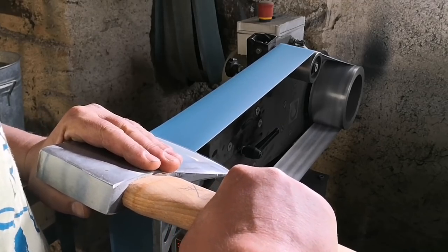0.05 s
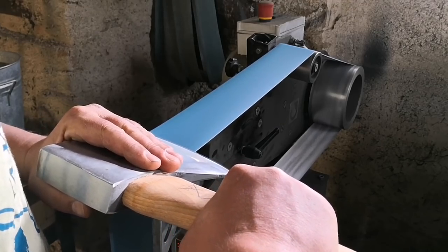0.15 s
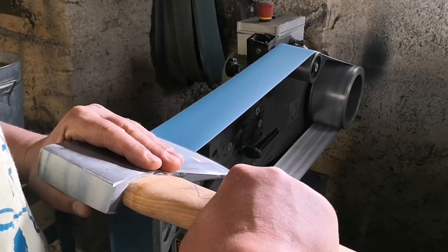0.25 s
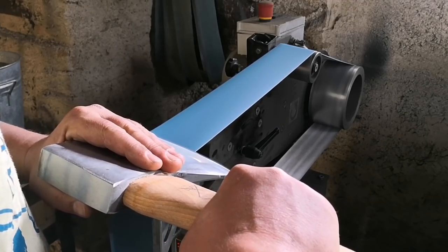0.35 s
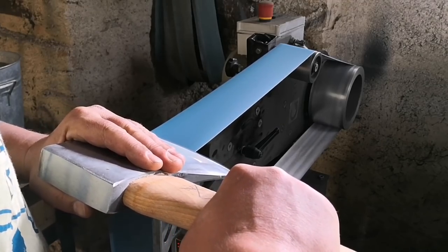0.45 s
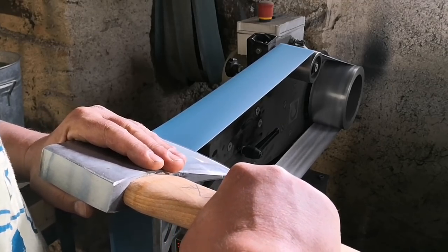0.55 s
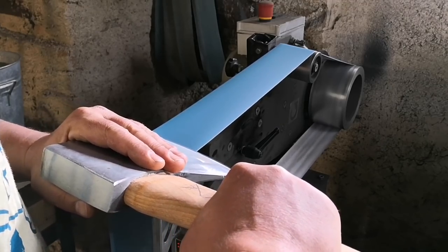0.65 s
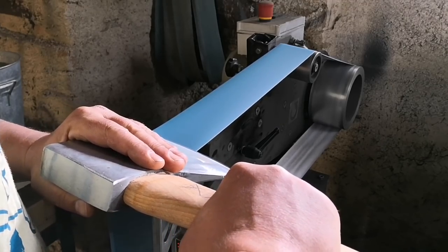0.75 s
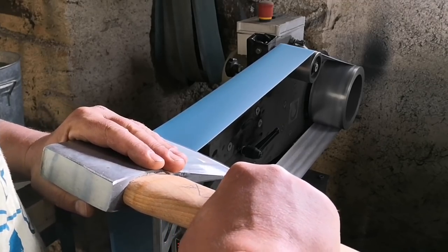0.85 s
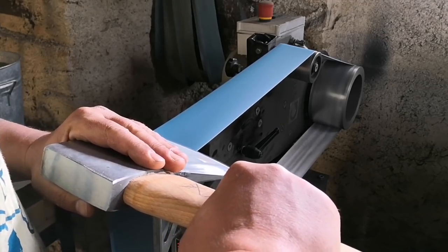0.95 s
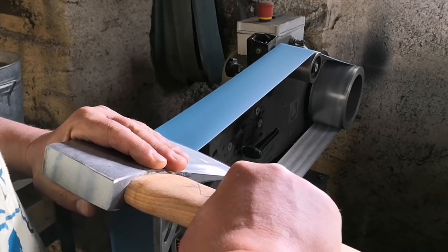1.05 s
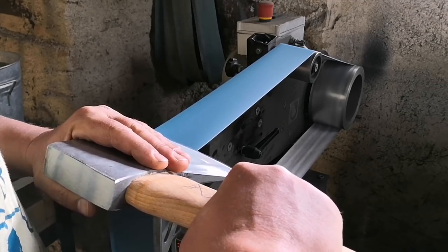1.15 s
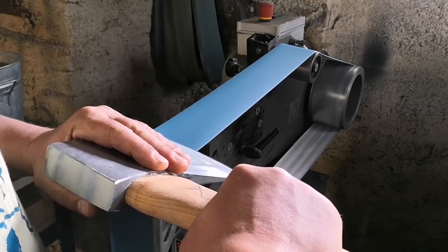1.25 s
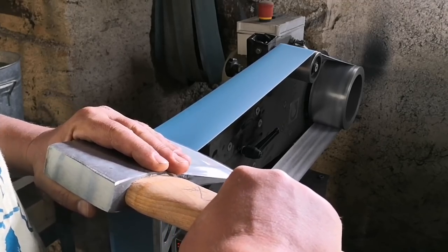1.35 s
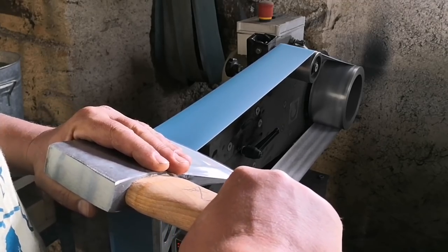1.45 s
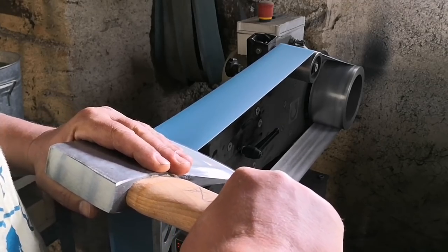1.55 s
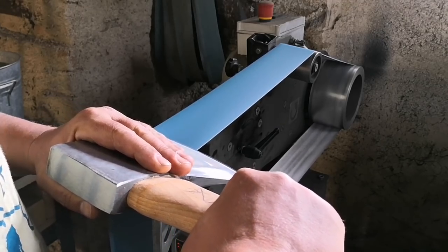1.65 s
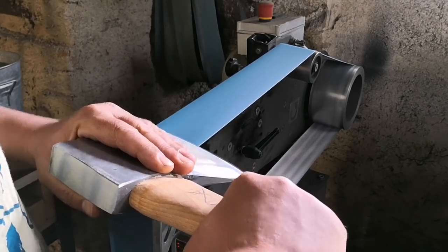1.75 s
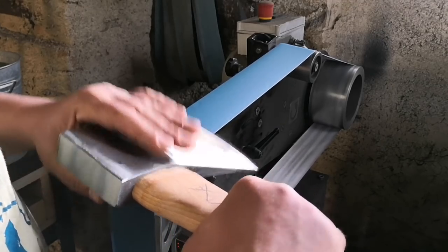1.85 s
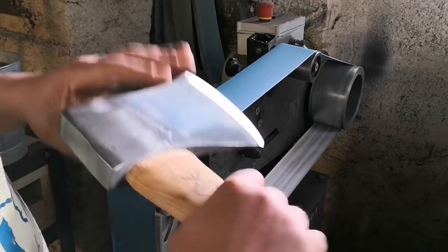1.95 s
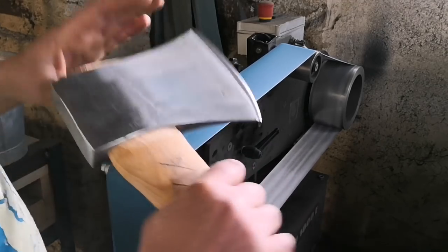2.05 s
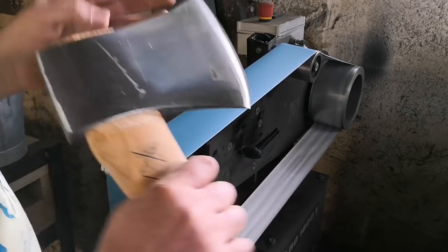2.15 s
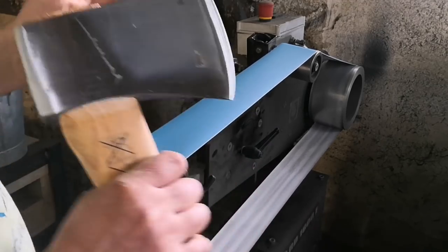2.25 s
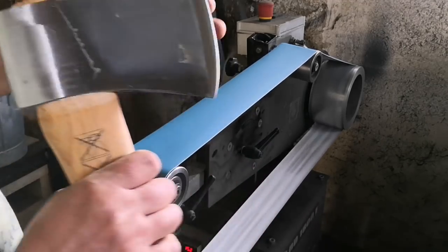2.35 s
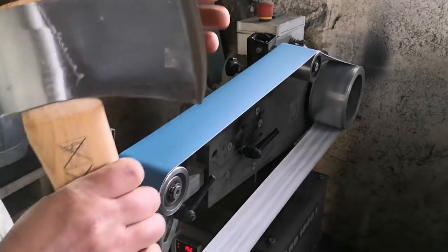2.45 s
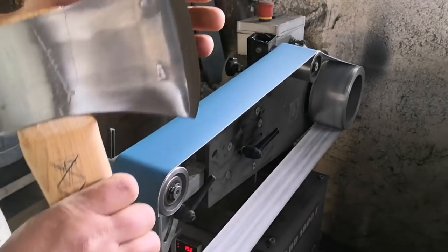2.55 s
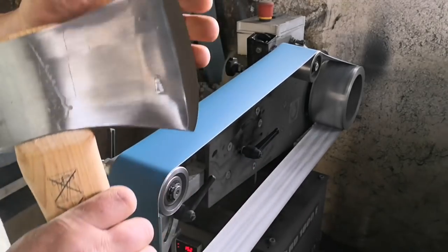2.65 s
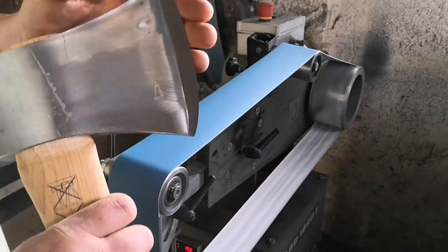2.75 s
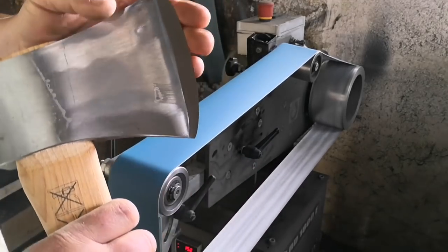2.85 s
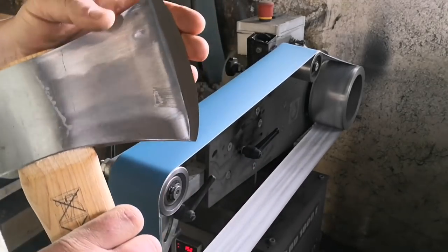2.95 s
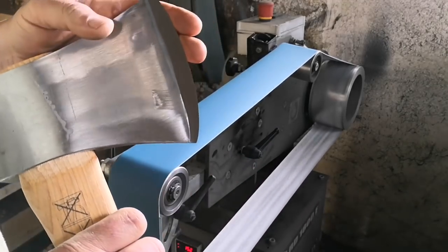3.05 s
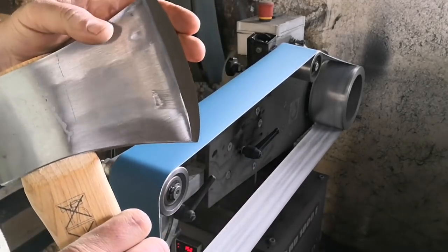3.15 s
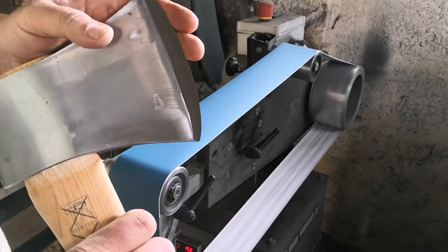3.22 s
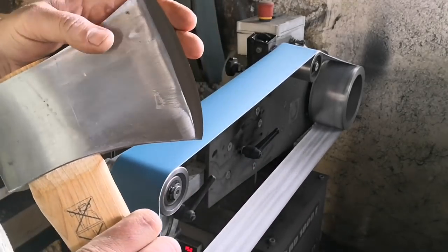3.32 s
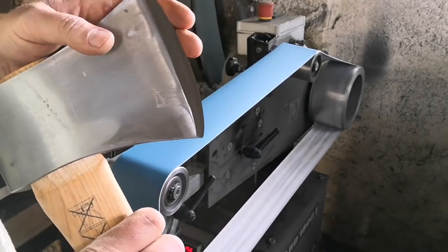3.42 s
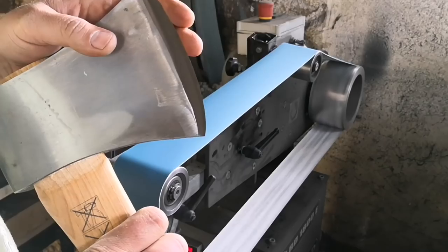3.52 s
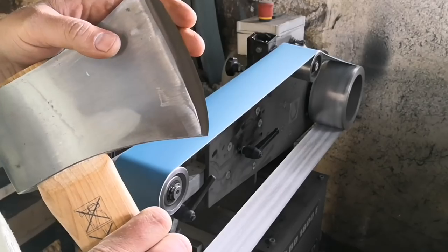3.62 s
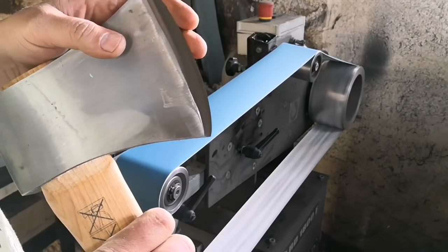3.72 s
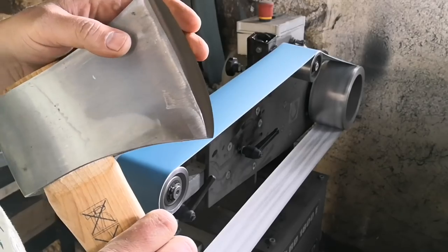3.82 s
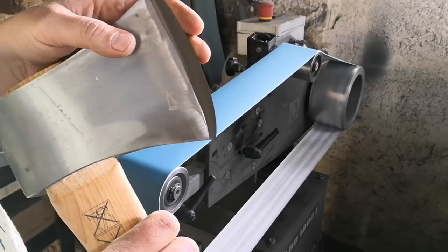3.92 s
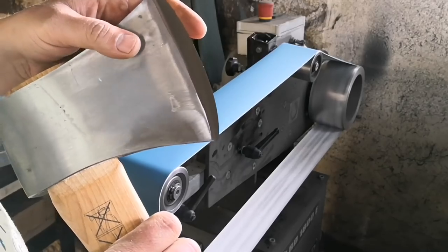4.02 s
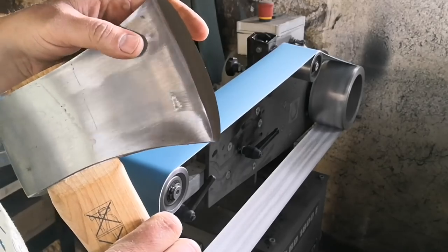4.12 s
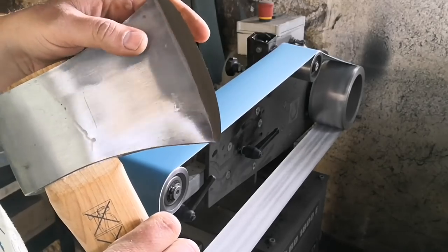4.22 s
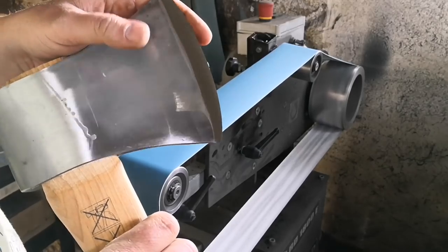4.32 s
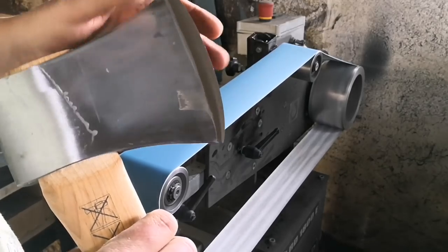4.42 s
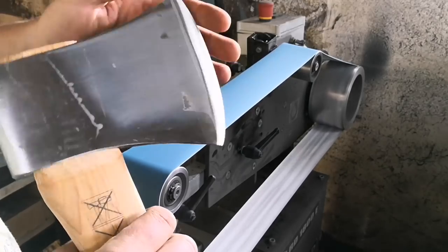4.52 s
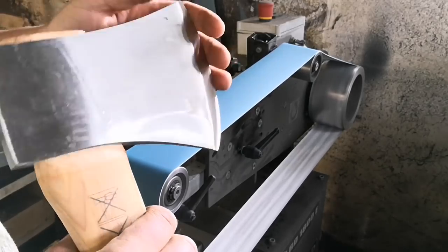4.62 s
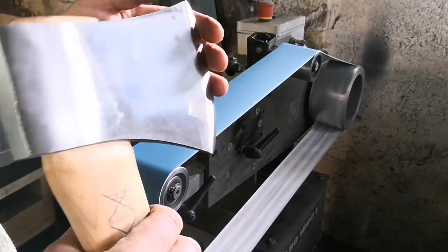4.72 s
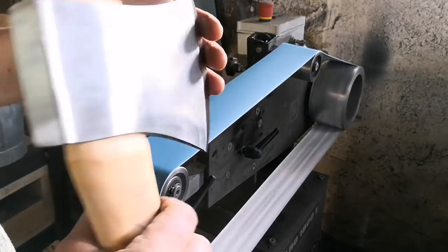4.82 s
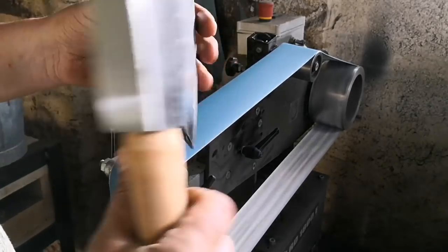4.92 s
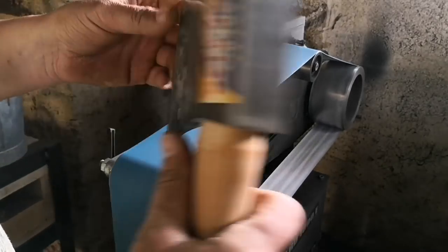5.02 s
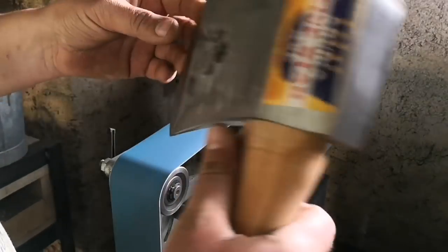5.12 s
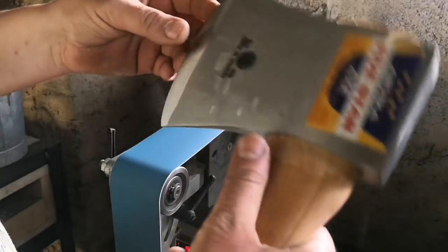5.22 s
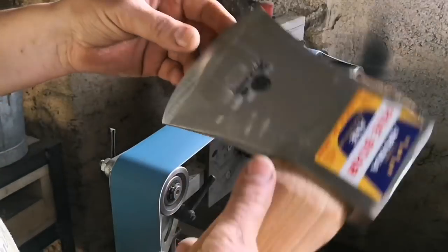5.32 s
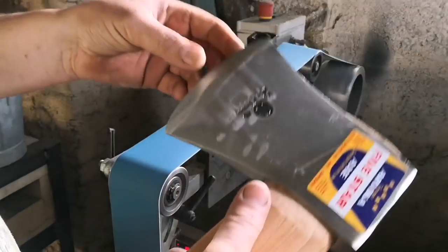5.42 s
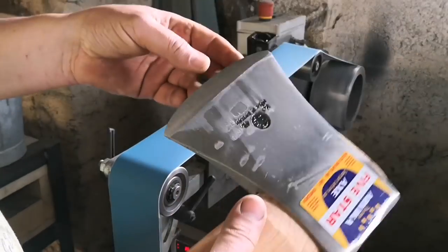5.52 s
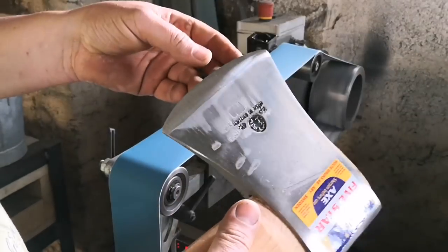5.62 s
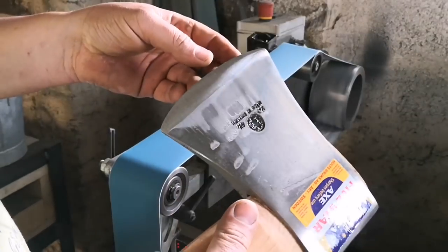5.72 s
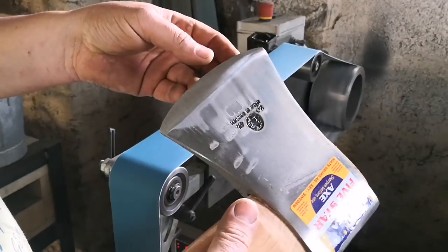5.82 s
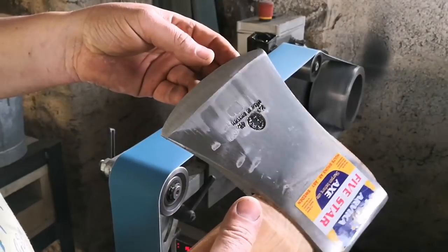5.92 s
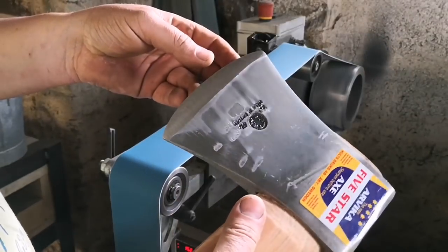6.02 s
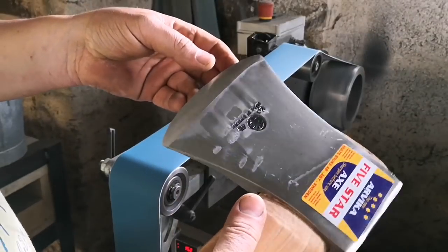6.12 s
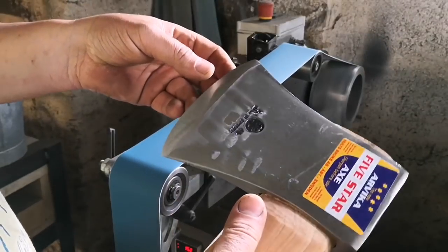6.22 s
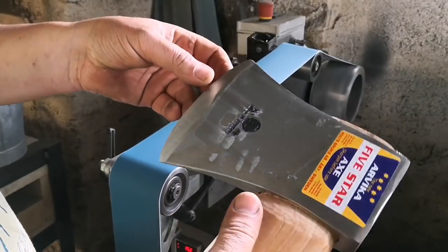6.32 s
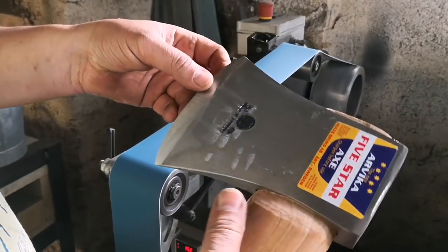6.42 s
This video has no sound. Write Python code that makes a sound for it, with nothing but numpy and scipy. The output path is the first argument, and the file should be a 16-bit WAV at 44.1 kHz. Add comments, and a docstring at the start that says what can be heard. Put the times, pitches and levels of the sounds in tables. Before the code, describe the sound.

A belt sander is already running at the start, heard close in stereo in a small stone-walled workshop. From 0 to about 1.9 s a steel axe edge is pressed on the belt: a dense, bright, gritty grinding with metallic ringing, a scrape gliding slightly in pitch, small high squeals and low rubbing. The belt's joint gives a soft, dull knock and twang about every 0.28 s, growing a little stronger. Pressure rises slightly from 1.55 s, then the grinding fades within a tenth of a second and is gone by 1.94 s. The free belt runs on to about 6.5 s with broad rushing, low motor hum, fluttering bearing hiss and a thin very high drive whine. A narrow mid-high belt ringing emerges, wavers and briefly flares near 4.76 s. A faint steady high steel note swells and fades between 1 and 4 s.

```python
"""Small stone-walled workshop: a belt sander runs while an axe edge is ground on it.
Random grit strikes ring the steel, a scrape glides in pitch, and the belt's splice knocks once a lap.
The hands bear down slightly, then lift the axe off at 1.94 s; the belt runs on free.
Shaped noise makes belt rush, bearing hiss and ringing; sines make hum and drive whine.
A faint, steady high steel note slowly swells and fades between 1 and 4 s."""
import sys
import numpy as np
from scipy import signal
from scipy.fft import rfft, irfft, next_fast_len
from scipy.io import wavfile
from scipy.ndimage import uniform_filter1d, map_coordinates

SR = 44100
rng = np.random.default_rng(int(sys.argv[2]) if len(sys.argv) > 2 else 0)


def wav_record(signal):
    """Record a signal, one row per channel, as 16-bit PCM in the file named by sys.argv[1]."""
    frames = np.transpose(np.atleast_2d(signal))
    bounded = np.clip(frames, -1, 1)
    # unit amplitude maps onto the largest positive 16-bit level
    quanta = np.round(bounded * 32767).astype(np.int16)
    wavfile.write(sys.argv[1], SR, quanta)


N = 285327

LAP_S, WHEEL_HZ = 0.2793, 41.7  # belt lap, wheel turns per second
LIFT_S, LIFT_TAKES_S = 1.94, 0.11  # edge clear of the belt, time to let go
BEAR_DOWN_S = 0.39  # pressure gain starts this long before LIFT_S

# machine a little to the right: f/Hz, left minus right/dB
BALANCE = [(250, 0.5), (650, -4), (1000, -2), (2300, -3.5), (3000, -1), (4300, -2.5), (5200, -4.5),
           (6300, -2.5), (7400, -7.5), (8300, 2), (11000, -1), (15000, 0)]


def from_db(db):
    """Decibels to amplitude gain."""
    return 10 ** (np.asarray(db) / 20)


def rms_one(x):
    """Scale to unit rms."""
    return x / np.sqrt(np.mean(x ** 2) + 1e-20)


def in_time(rows):
    """Each column of a time curve at every sample."""
    s, *columns = np.transpose(rows)
    return [np.interp(np.arange(N) / SR, s, c) for c in columns]


def at_hz(points, hz):
    """Interpolate a curve on a log-frequency axis."""
    points = np.array(points)
    return np.interp(np.log(hz + 1e-9), np.log(points[:, 0]), points[:, 1])


def drift(rate_hz):
    """Smooth random curve of rms 1, about rate_hz new values a second."""
    coarse = np.arange(0, N + 32, 32)
    knots = rng.standard_normal(4096)
    slow = map_coordinates(knots, [coarse / SR * rate_hz], order=3, mode="wrap")
    return np.interp(np.arange(N), coarse, rms_one(slow))


def ramp(start_s, length_s):
    """Rise from 0 to 1 over length_s."""
    return np.clip((np.arange(N) / SR - start_s) / length_s, 0, 1)


def pan(left_db):
    """Channel gains for a left-minus-right level difference."""
    return from_db(np.array([[0.5], [-0.5]]) * left_db)


def at_ears(hz):
    """Complex gain at left and right: level balance, plus a lag that vanishes in deep bass."""
    # left behind right: f/Hz, lag/s
    left_lag = [(200, 0), (320, .0003), (430, .00088), (700, .000612), (15000, .000612)]
    turn = 2 * np.pi * hz * at_hz(left_lag, hz)
    return pan(at_hz(BALANCE, hz)) * np.exp(1j * turn * np.array([[-0.5], [0.5]]))


def radiate(force, spectrum, modes, ripple_db=2.0, ripple_hz=16):
    """Filter two unrelated forces by a broad spectrum and resonances, and spread them to left and right."""
    # likeness of the two channels: f/Hz, coherence/1
    likeness = [(30, 0.96), (200, 0.99), (310, 0.67), (430, -0.24), (530, 0.24), (680, 0.55), (950, 0.2),
                (2000, -0.038), (4000, 0.26), (15000, -0.37)]
    size = next_fast_len(N + SR // 2)
    hz = np.arange(size // 2 + 1) * SR / size
    power = from_db(at_hz(spectrum, hz)) ** 2 if spectrum else 0
    for centre_hz, width_hz, db in modes:
        # db is the peak's total power; width_hz is its half-width at -6 dB
        skirt = 1 / (1 + ((hz - centre_hz) / width_hz) ** 2) ** 2
        power = power + from_db(db) ** 2 * 2 / (np.pi * width_hz) * skirt
    # standing waves between the walls favour some pitches over their neighbours
    uneven = map_coordinates(rng.standard_normal(4096), [hz / ripple_hz], order=1, mode="wrap")
    mid, side = rfft(force, size) * np.sqrt(power * SR / 2) * from_db(ripple_db * uneven)
    alike = np.clip(at_hz(likeness, hz), -1, 1)
    pair = np.sqrt((1 + alike) / 2) * mid + np.sqrt((1 - alike) / 2) * side * [[1], [-1]]
    return irfft(pair * at_ears(hz), size)[:, :N]


def gliding_ring(force, pitch_hz, width_hz):
    """Resonance of moving pitch: shift the force down, low-pass, shift back; rms 1 before panning."""
    carrier = np.exp(2j * np.pi * np.cumsum(pitch_hz) / SR)
    narrow = signal.butter(2, width_hz / 2, fs=SR, output="sos")
    ringing = signal.sosfilt(narrow, force / carrier) * carrier
    return rms_one(ringing.real) * pan(at_hz(BALANCE, pitch_hz))


def singing(modes, level, steady=0.36):
    """Narrow resonances kept ringing by rolling contact; they share one level curve."""
    level_db, = in_time(level)
    ringing = radiate(rng.standard_normal((2, N)), None, modes)
    # constant rubbing partly evens the slow swell and leaves the fast flutter
    mean_power = uniform_filter1d(np.mean(rms_one(ringing) ** 2, axis=0), size=SR // 12)
    swell = np.sqrt(mean_power + 1e-6)
    return ringing / swell ** steady * from_db(level_db)


def wheel_throb(once, twice):
    """Slightly oval wheels press harder once and twice a turn."""
    angle = 2 * np.pi * WHEEL_HZ * np.arange(N) / SR
    return 1 + once * np.sin(angle) + twice * np.sin(2 * angle)


def hand_pressure(press=0.94, unsteady_db=0.2, bear_down_db=1.5):
    """Nearly even pressure (nominal full = 1) that grows slightly before the hands let go."""
    level_db = unsteady_db * drift(6.5) + bear_down_db * ramp(LIFT_S - BEAR_DOWN_S, BEAR_DOWN_S)
    return press * from_db(level_db) * (1 - ramp(LIFT_S - LIFT_TAKES_S, LIFT_TAKES_S))


def belt(pressure, free_db=-0.5, load_db=-2, repeating=0.22, flutter_db=0.71, damping=0.91):
    """The belt's rough back drums wheels and frame; a share of the noise power repeats each lap."""
    # belt rush before gain: f/Hz, density/dB per Hz
    rush = [(20, -98), (45, -87), (85, -84), (115, -95.5), (270, -84), (370, -84.5), (700, -82.5),
            (980, -70.5), (1450, -71.5), (2000, -66.5), (2330, -66), (2700, -69), (2950, -74),
            (4000, -122.5)]
    # frame and stand, before gain: f/Hz, half-width/Hz, level/dB
    frame_modes = [(141, 9.5, -63), (166.2, 3, -64), (200.8, 3.8, -69.5), (313.4, 3.1, -65), (746, 59, -65),
                   (1060, 56, -52.5), (1330, 53, -57.5), (3262, 21, -52.5), (3770, 17, -52.5),
                   (4260, 22, -53)]
    # free belt and wheels, damped by the axe, before gain: f/Hz, half-width/Hz, level/dB
    wheel_modes = [(930, 22, -58), (1140, 12, -51.5), (1478, 16, -62), (2232, 24, -51.5), (2348, 16, -51),
                   (2382, 16, -49), (2577, 12, -50.5)]
    one_lap = rng.standard_normal((2, round(LAP_S * SR)))
    laps = np.tile(one_lap, int(N / SR / LAP_S) + 2)[:, :N]
    force = np.sqrt(repeating) * laps + np.sqrt(1 - repeating) * rng.standard_normal((2, N))
    level_db = free_db + load_db * pressure + flutter_db * drift(30)
    drive = wheel_throb(once=0.06, twice=0.015) * from_db(level_db)
    wheel_force = rng.standard_normal((2, N)) * drive * (1 - damping * pressure)
    return radiate(force * drive, rush, frame_modes) + radiate(wheel_force, None, wheel_modes)


def belt_whine():
    """Narrow ringing of the belt: faint under the axe, strong once free, with a varying level."""
    # before the level curve: f/Hz, half-width/Hz, level/dB
    whine_modes = [(1783, 20, -50), (1843, 8, -44)]
    # t/s, gain/dB
    whine_level = [(0, -24), (2.08, -10), (2.16, 1.5), (2.4, -2), (2.7, -2.5), (3.35, -7), (3.55, -0.5),
                   (4.4, -2), (4.71, 1), (4.76, 9.5), (4.82, -10), (4.95, -0.5), (5.03, 1), (5.2, 2),
                   (5.5, -2), (5.85, 2.5), (6.47, -3)]
    return singing(whine_modes, whine_level)


def platen(free_hz=1068, loaded_hz=1138, free_db=-49.0, loaded_db=-49.5, width_hz=19, settle_s=0.13):
    """The platen under the belt rings higher under load; its pitch slides down around the lift."""
    load = 1 - ramp(LIFT_S - BEAR_DOWN_S, BEAR_DOWN_S + settle_s)
    pitch_hz = free_hz + (loaded_hz - free_hz) * load
    level_db = free_db + (loaded_db - free_db) * load
    return gliding_ring(rng.standard_normal((2, N)), pitch_hz, width_hz) * from_db(level_db)


def bearings(pressure, free_db=-2.01, load_db=0.4):
    """Rolling balls hiss and keep the races and the idler ringing, in time with the wheels."""
    # hiss before gain: f/Hz, density/dB per Hz
    hiss_spectrum = [(2400, -97), (3200, -73), (4000, -68.5), (4600, -69), (5300, -73), (6100, -73.5),
                     (6550, -77), (7350, -72.5), (7950, -77), (8400, -101.5), (9700, -102), (11000, -94),
                     (12300, -100), (15000, -112)]
    # bearings, races and idler, before gain: f/Hz, half-width/Hz, level/dB
    bearing_modes = [(4510, 30, -52), (5230, 20, -58), (5610, 30, -55), (6040, 35, -56), (6170, 35, -55)]
    race_modes = [(6965, 14, -55), (7044, 13, -49.5), (7092, 16, -54), (7236, 13, -49.5), (7303, 22, -49.5)]
    idler_modes = [(4890, 130, -52), (4810, 35, -50.5), (4873, 18, -48.5), (5005, 22, -52)]
    # ring of races and idler: t/s, gain/dB
    race_level = [(0, 0), (1.9, 0.5), (2.2, -2.5), (2.45, 2.5), (2.7, 2), (2.92, 4), (3.3, 0.5), (4.3, -3),
                  (4.8, 0), (5.27, 2.5), (5.5, 0), (5.8, 2), (6.1, -2), (6.47, 4)]
    idler_level = [(0, -1), (1.9, 1), (2.15, -1), (2.3, -5), (2.5, -1), (2.7, 3), (2.85, -2), (3.3, -4),
                   (3.5, 0.5), (4.3, -3), (4.8, -4), (5.1, 0), (5.35, 2.5), (5.7, 4), (5.9, 6), (6.1, 1.5),
                   (6.3, 2), (6.47, 2)]
    force = rng.standard_normal((2, N)) * from_db(free_db + load_db * pressure)
    hiss = radiate(force, hiss_spectrum, bearing_modes)
    races = singing(race_modes, race_level)
    idler = singing(idler_modes, idler_level)
    return wheel_throb(once=0.048, twice=0.05) * (hiss + races + idler)


def hum(pressure, waver_db=1.76, waver_ref_hz=100, wander=0.0023, slip=0.018, lag_s=0.015):
    """Unbalanced turning parts hum; load slows them and shifts each tone's level, after a short lag."""
    # motor and wheels: f/Hz unloaded, mean level free/dB, mean level loaded/dB
    hum_tones = [(42, -74, -73), (68.3, -66.5, -63), (90.9, -53, -61.5), (100.2, -65, -62),
                 (282.7, -71, -66.5), (404, -71, -71), (434, -65, -82)]
    out, t = np.zeros((2, N)), np.arange(N) / SR
    load = np.interp(t - lag_s, t, pressure) ** 0.5
    for hz, free_db, loaded_db in hum_tones:
        speed = 1 - slip * load + wander * drift(25.4)
        angle = 2 * np.pi * np.cumsum(hz * speed) / SR
        # higher tones waver more
        waver = waver_db * (hz / waver_ref_hz) ** 0.5 * drift(22)
        level_db = free_db + (loaded_db - free_db) * load + waver
        out += np.sqrt(2) * from_db(level_db) * (np.exp(1j * angle) * at_ears(hz)).real
    return out


def whine(waver_db=2.0):
    """The motor drive switches at a high pitch: close, slightly wandering tones that beat."""
    # f/Hz, mean level/dB, rms wander/Hz
    drive_tones = [(13415, -63, 4), (13447, -64, 5), (14320, -76, 20), (14400, -72, 20), (14442, -75, 20)]
    out = np.zeros((2, N))
    for hz, db, wander_hz in drive_tones:
        angle = 2 * np.pi * np.cumsum(hz + wander_hz * drift(30)) / SR
        level_db = db + waver_db * drift(30)
        out += np.sqrt(2) * from_db(level_db) * (np.exp(1j * angle) * at_ears(hz)).real
    return out


def grit(per_s, spread_db):
    """Abrasive grains strike at random, most lightly and a few hard; rms 1."""
    hits = rng.random((2, N)) < per_s / SR
    sizes = from_db(spread_db * np.minimum(rng.exponential(1, (2, N)), 4))
    return rms_one(hits * sizes * rng.choice([-1, 1], (2, N)))


def grinding(pressure, chatter_db=1.2, chatter_hz=130, surge_db=0.76, surge_hz=24,
             scrape_db=-50, scrape_width_hz=150):
    """Grit cuts the steel in proportion to pressure; one resonance follows the contact point."""
    # before pressure: f/Hz, density/dB per Hz
    cut_spectrum = [(40, -106), (150, -96), (290, -93.5), (550, -78), (880, -82.5), (1200, -71),
                    (1480, -71), (2050, -71.5), (2720, -66), (3100, -72.5), (3700, -81.5), (7700, -75),
                    (8500, -89), (10000, -89.5), (15000, -85.5)]
    # axe head held on the belt, before pressure: f/Hz, half-width/Hz, level/dB
    axe_modes = [(147, 7.7, -63.5), (554, 15, -55.5), (1060, 23, -53.5), (1129, 21, -50), (1218, 21, -47.5),
                 (1721, 30, -50.5), (1778, 17, -48.5), (1895, 20, -48), (1985, 18, -51), (2062, 13, -45),
                 (2157, 22, -43), (2327, 25, -45.5), (2650, 20, -48), (3524, 23, -50), (4960, 170, -51),
                 (5350, 78, -49.5), (5920, 22, -50), (6980, 49, -49.5), (7640, 280, -45)]
    # scrape as contact slides along the edge: t/s, f/Hz
    scrape_pitch = [(0, 1950), (.25, 2110), (1.05, 2100), (1.5, 1960), (1.8, 2160)]
    rasp_db = chatter_db * drift(chatter_hz) + surge_db * drift(surge_hz)
    force = grit(per_s=9000, spread_db=3.0) * pressure * from_db(rasp_db)
    pitch_hz, = in_time(scrape_pitch)
    scrape_gain = np.sqrt(np.mean(pressure ** 2)) * from_db(scrape_db)
    scrape = gliding_ring(force, pitch_hz, scrape_width_hz) * scrape_gain
    return radiate(force, cut_spectrum, axe_modes) + scrape


def rub(pressure, level_db=-1, uneven_db=1.5, bumps_hz=35):
    """Uneven belt drag between blade and platen, as pressure squared: the low rub leaves first."""
    # platen and tool rest, before drag and gain: f/Hz, half-width/Hz, level/dB
    rub_modes = [(163, 6.2, -66), (204, 5.9, -67), (308, 8, -68), (224, 10, -71), (395, 7.5, -67),
                 (423, 4.5, -63), (473, 14, -66), (582, 17, -64), (706, 12, -58), (794, 28, -61)]
    drag = pressure ** 2 * rms_one(from_db(uneven_db * drift(bumps_hz)))
    force = rng.standard_normal((2, N)) * drag
    return radiate(force, None, rub_modes, ripple_db=3.5) * from_db(level_db)


def squeal(pressure, level_db=2.0, spurt_db=3.5, spurts_hz=45):
    """The steel edge sticks and slips on the grit, and rings up in spurts."""
    # before gain: f/Hz, half-width/Hz, level/dB
    squeal_modes = [(4865, 30, -50), (4975, 45, -48)]
    spurts = from_db(level_db + spurt_db * np.tanh(drift(spurts_hz)))
    return radiate(rng.standard_normal((2, N)), None, squeal_modes, ripple_db=0.5) * spurts * pressure


def ring(clicks, hz, t60_s):
    """Two-pole resonator: a unit click starts a decaying sine of height 1."""
    r, w = from_db(-60 / (t60_s * SR)), 2 * np.pi * hz / SR
    return signal.lfilter([0, np.sin(w)], [1, -2 * r * np.cos(w), r * r], clicks + 1e-18)


def belt_twang(start_hz=620, fall_s=0.063, ring_s=0.13, width_hz=110, attack_s=0.03):
    """Bending waves scatter along the taut belt, different each time; low pitches arrive last."""
    t = np.arange(SR // 7) / SR
    pitch_hz = start_hz * np.exp(-t / fall_s)
    narrow = signal.butter(2, width_hz / 2, fs=SR, output="sos")
    scatter = signal.sosfilt(narrow, rng.standard_normal((2, SR // 2)))[:, -len(t):]
    carrier = np.exp(2j * np.pi * np.cumsum(pitch_hz) / SR)
    wave = ((scatter[0] + 1j * scatter[1]) * carrier).real
    envelope = np.exp(-t / ring_s) * np.minimum(t / attack_s, 1) * (1 - t / t[-1])
    return rms_one(wave) * envelope


def workshop(x, t60_s=0.23, first_s=0.008):
    """Dense wall reflections, different at each side, dying away."""
    t = np.arange(SR // 2) / SR
    tail = rng.standard_normal((2, len(t))) * from_db(-60 * t / t60_s) * (t > first_s)
    return signal.fftconvolve(x[None], rms_one(tail) / np.sqrt(len(t)), axes=1)[:, :N]


def splice(first_s=0.062, first_db=-39.5, rise_db_per_s=2, knock_db=5, room_db=-9,
           contact_hz=900, twang_db=-11.0):
    """The belt's thick joint bumps the blade and plucks the belt each lap, harder until the lift."""
    # blade and platen, relative to the click: f/Hz, level/dB, t60/s
    knock_modes = [(140.5, -25, 0.56), (202.7, -16.5, 0.6), (190, -16, 0.063), (222.5, -20, 0.23),
                   (340, -10, 0.022), (490, 1, 0.02), (558, 1.5, 0.037), (630, -2, 0.012)]
    clicks, knock = np.zeros(N), np.zeros(N)
    for s in np.arange(first_s, LIFT_S, LAP_S):
        db = first_db + rise_db_per_s * s
        at, twang = round(s * SR), belt_twang()
        clicks[at] += from_db(db + knock_db)
        knock[at:at + len(twang)] += from_db(db + twang_db) * twang
    soft = signal.sosfilt(signal.butter(2, contact_hz, fs=SR, output="sos"), clicks)
    for k, (hz, db, t60_s) in enumerate(knock_modes):
        knock += (-1) ** k * from_db(db) * ring(soft, hz, t60_s)
    return knock * pan(left_db=-2.5) + from_db(room_db) * workshop(knock)


def steel_note():
    """One faint steady high tone that slowly swells and fades: a sine under a half-sine envelope."""
    # end/s, f/Hz, peak level/dB, minus duration/s
    end_s, hz, db, minus_length_s = (4, 3984, -49, -3)
    tone = np.exp(2j * np.pi * hz * np.arange(N) / SR) * at_ears(hz)
    swell = np.sin(np.pi * ramp(end_s + minus_length_s, -minus_length_s))
    return from_db(db) * swell * tone.real


def axe_screen(right_loss_db=0.77):
    """The raised axe head shades the machine at the right, then is turned aside."""
    raised = ramp(1.8, 1) - ramp(4, 1)
    return from_db(-right_loss_db * raised * np.array([[0], [1]]))


def scene():
    """The running machine plus the axe, first on its belt and then held up in front of it."""
    pressure = hand_pressure()
    running = axe_screen() * (belt(pressure) + belt_whine() + platen() + bearings(pressure))
    tones = hum(pressure) + whine() + steel_note()
    contact = grinding(pressure) + rub(pressure) + squeal(pressure) + splice()
    return running + tones + contact


def record(dry):
    """Steep elliptic low-pass at 15.3 kHz."""
    return signal.sosfilt(signal.ellip(12, 0.1, 80, 15300, fs=SR, output="sos"), dry)


dry = scene()
out = record(dry)
wav_record(out)
```